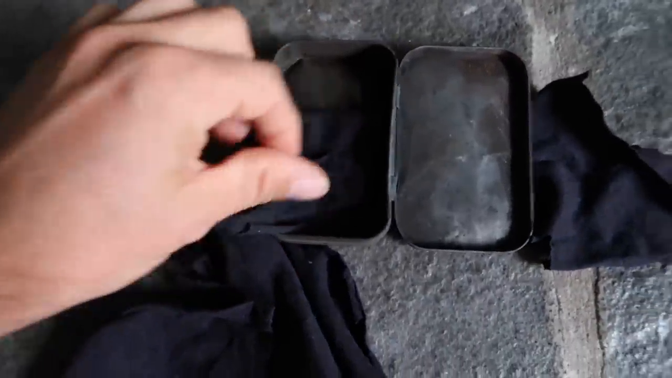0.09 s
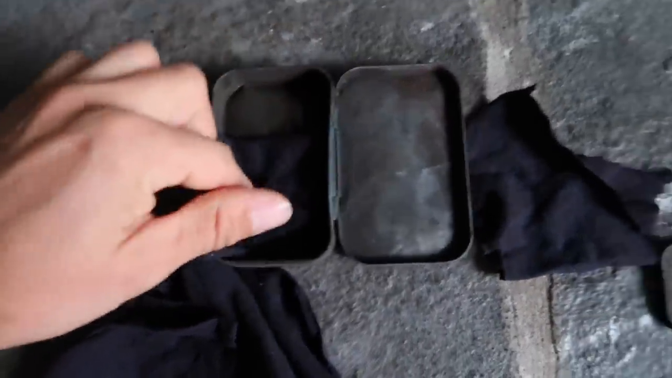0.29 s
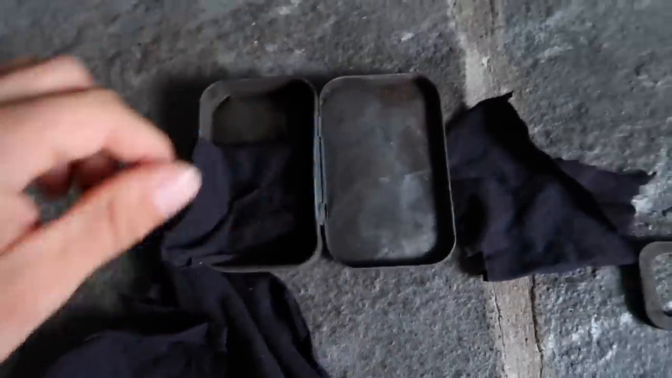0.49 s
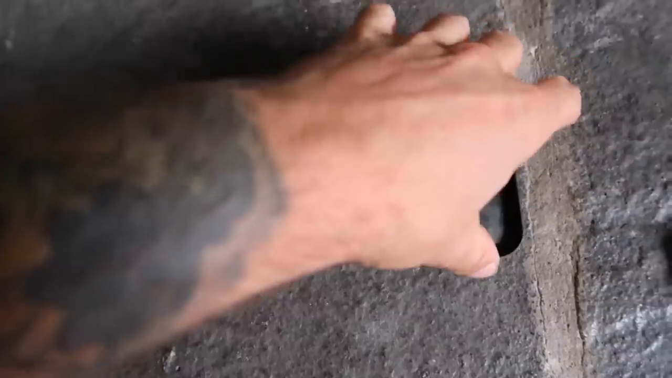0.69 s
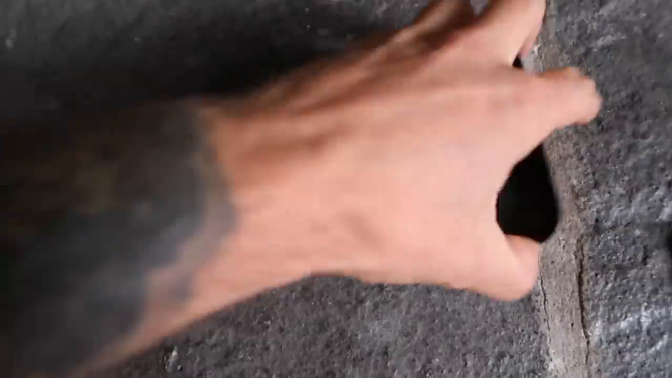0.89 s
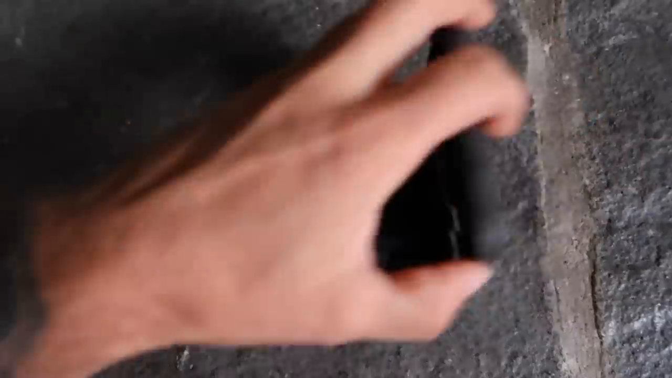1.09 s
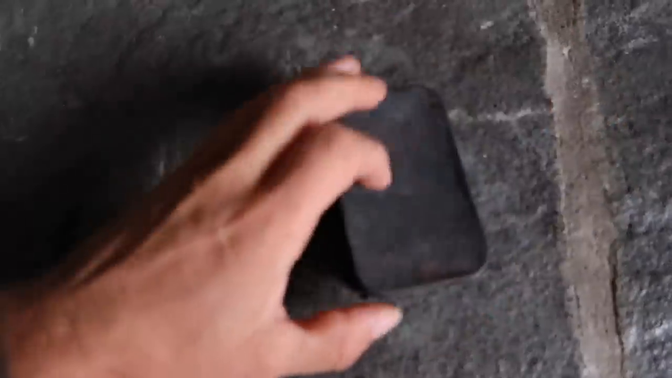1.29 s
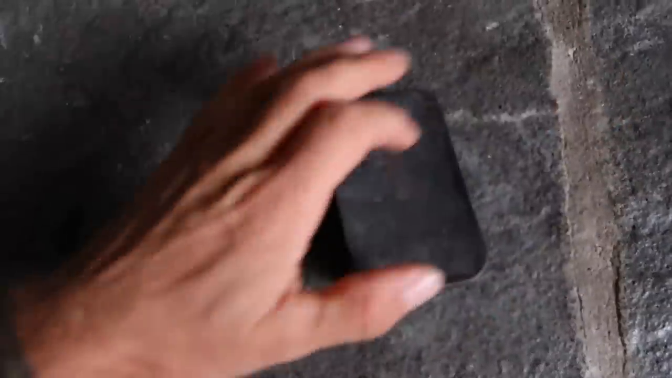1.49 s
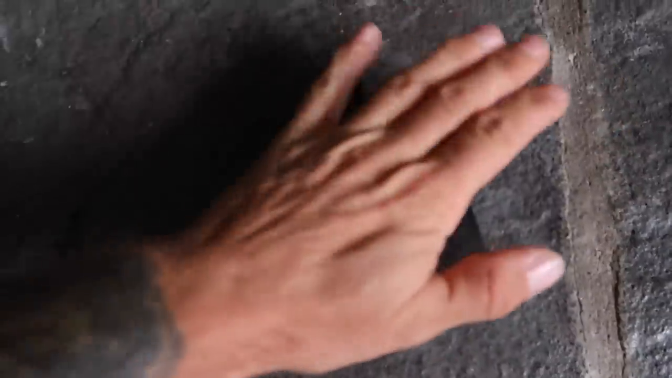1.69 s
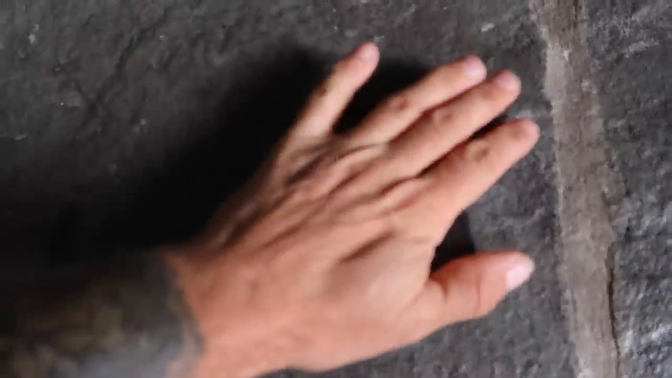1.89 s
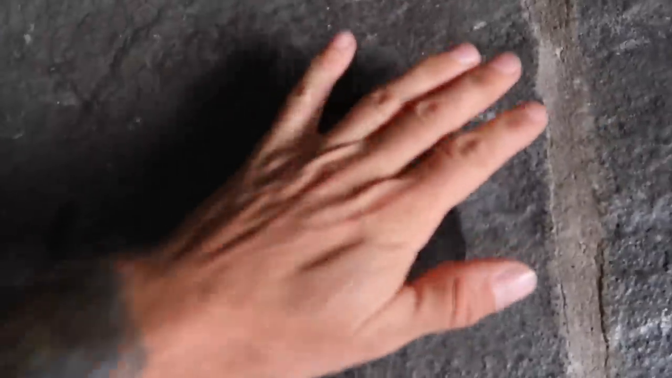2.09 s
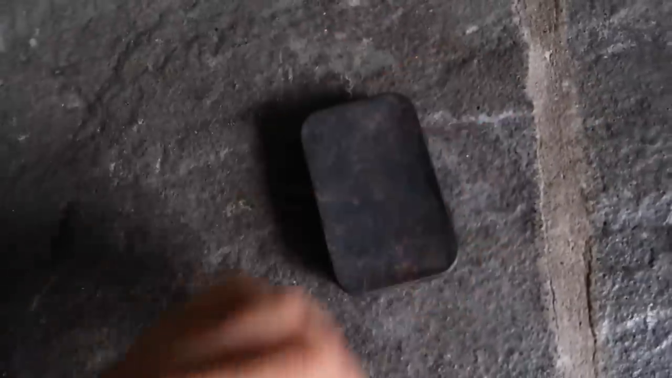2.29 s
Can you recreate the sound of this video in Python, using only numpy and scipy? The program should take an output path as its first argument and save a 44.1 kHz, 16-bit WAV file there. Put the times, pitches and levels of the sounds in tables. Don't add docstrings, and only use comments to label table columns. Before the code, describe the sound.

A small hinged metal tin is handled close up on stone. Near silence, then a sharp rattling clatter at 0.2-0.3 s. Gripping and lifting knocks with scrapes run from 0.8 to 1.1, loud folding clacks from 1.2 to 1.5. After a pause, it snaps shut at 1.83, settles with a low thud at 1.95, and knocks once at 2.14. Small dry room, faint hum, hiss and thin high whine.

```python
import sys
import numpy as np
from scipy import signal
from scipy.fft import rfft, irfft
from scipy.io import wavfile
from scipy.ndimage import uniform_filter1d

SR = 44100
rng = np.random.default_rng(int(sys.argv[2]) if len(sys.argv) > 2 else 0)


def bounce(signal):
    frames = np.transpose(np.atleast_2d(signal))
    limited = np.clip(frames, -1, 1)
    pcm = np.round(limited * 32767).astype(np.int16)
    wavfile.write(sys.argv[1], SR, pcm)


def nominal_scale(level):
    x = np.asarray(level, float) / 20
    return 10 ** x


N = 108045

# f/Hz, level/dB per Hz; then f/Hz, left-right likeness
HUM_COLOUR = [(33, -9), (50, 1), (600, -8.5), (2100, -19), (12000, -34), (13500, -67)]
HUM_SAME = [(70, 1), (300, 0.19), (2400, .3), (15000, -0.11)]
# f/Hz, likeness
PORT_SAME = [(700, 1), (2000, 0.95), (5000, 0.79), (10000, -0.23)]
# f/Hz, t60/s
ROOM_T60 = [(300, 0.2), (1500, 0.24), (12000, 0.55)]

# t/s, level/dB (peak), f/Hz (pitch that rings most), brightness/dB, crack/dB
NUDGE_KNOCKS = [
    (.202, -21, 1540, -63, -7),
    (.2155, -12, 1470, -51, -2.5),
    (.25, -9, 1360, -24, -6),
    (.2555, -12.5, 2080, -16.5, -11),
    (.269, -11, 1300, -18, -5),
    (.2815, 1.5, 1950, -13, 5),
    (.286, -5.5, 1820, -9.5, -1.5),
    (.385, -29, 1220, -73, -4),
]
GRIP_KNOCKS = [
    (.723, -34.5, 1830, -19, -27),
    (.729, -27, 1870, -39.5, -20),
    (.828, -8.5, 2960, -27, -12.5),
    (.88, -25, 1300, -46, -26),
    (.897, -5, 2015, -32, -32),
    (.909, -13, 2200, -31, 15.5),
    (.95, -36, 1870, -55, -20),
    (.961, -20.5, 1880, -20, -32),
]
LIFT_KNOCKS = [
    (.989, -11, 3385, -25.5, -35),
    (1.005, -26, 2150, -19, -4),
    (1.026, -27.5, 1270, -34.5, -32),
    (1.046, -27, 1260, -36.5, -7),
    (1.086, -31.5, 1280, -33, -28),
    (1.095, -14, 1930, -46, -7),
    (1.107, -26, 1240, -31.5, -18),
]
SWING_KNOCKS = [
    (1.158, -29, 1810, -32, -3),
    (1.165, -27.5, 1215, -25, -14.5),
]
FOLD_KNOCKS = [
    (1.216, -4.5, 1820, -24, -23.5),
    (1.218, -20.5, 5140, -20.5, -16),
    (1.302, -25.5, 1163, -28, 17),
    (1.349, -5, 2170, -20, -7.5),
    (1.371, -3.5, 1330, -18, 7),
]
SEAT_KNOCKS = [
    (1.426, -10.5, 1520, -24.5, -3),
    (1.467, -21, 955, -53, -10),
    (1.516, -5, 1730, -33.5, -2.5),
]
PRESS_KNOCKS = [
    (1.807, -27, 982, -63.5, 16),
    (1.816, -23, 1158, -45, 1),
    (1.826, -21, 960, -28.5, 4),
    (1.8325, -3, 1003, -43, 20),
    (1.839, -6.5, 1300, -20.5, 0),
    (1.858, -17.5, 776, -38, -9),
    (1.865, -19, 925, -18, -11),
    (1.874, -9.5, 3280, -24.5, 0),
    (1.879, -12, 1780, -19.5, -0.5),
]
SETTLE_KNOCKS = [
    (1.907, -17.5, 650, -37, -8),
    (1.915, -15, 650, -34, -5),
    (1.938, -17.5, 1150, -41.5, -13),
    (1.948, -14.5, 860, -25, -11.5),
    (1.955, -11, 926, -18.5, 0),
    (1.962, -18, 650, -32, 7.5),
]
LEAVE_KNOCKS = [
    (2.119, -29, 850, -34, 4),
    (2.126, -25.5, 873, -29, 9.5),
    (2.143, -9.5, 1406, -29, -2),
]

# t/s, level/dB
EARLIER_CLANK_TAIL = [(0, -43), (0.031, -66.5), (.08, -76)]
NUDGE_RUB = [(.2, -25), (0.21, -32), (0.227, -15.5), (.245, -19.5), (.258, -23.5), (0.264, -29.5),
             (.273, -18), (.3, -35.5), (0.359, -56)]
GRIP_RUB = [(.715, -50), (.74, -38), (.78, -59), (.87, -46.5), (.885, -38), (.92, -25.5), (.94, -29),
            (.962, -21.5), (.982, -28)]
LIFT_RUB = [(.98, -49), (0.999, -23), (1.05, -31), (1.071, -30), (1.098, -26.5), (1.127, -62)]
SWING_RUB = [(1.115, -50), (1.13, -37.5), (1.148, -36), (1.17, -45), (1.189, -38.5), (1.208, -69.5)]
FOLD_RUB = [(1.22, -26), (1.26, -42.5), (1.333, -36), (1.362, -13.5), (1.4, -27.5), (1.42, -72)]
SEAT_RUB = [(1.379, -25), (1.41, -35), (1.47, -41), (1.499, -43.5), (1.539, -29.5), (1.6, -61)]
PRESS_RUB = [(1.799, -71.5), (1.812, -39), (1.829, -16), (1.848, -24), (1.87, -23.5), (1.895, -45),
             (1.903, -40)]
SETTLE_RUB = [(1.9, -34), (1.916, -30), (1.936, -35), (1.953, -12.5), (1.969, -50), (1.984, -36)]
LEAVE_RUB = [(2.104, -47.5), (2.127, -37), (2.152, -33.5), (2.2, -48), (2.249, -59.5)]

# f/Hz, level/dB
NUDGE_MODES = [(1000, -25), (1357, -2.5), (1545, -3.5), (1776, -5), (1940, -5), (2040, -4), (2410, -22),
               (2822, -9), (3020, -5), (3400, -15.5), (3680, -10.5), (4930, -19.5), (5200, -11)]
GRIP_MODES = [(1300, -3.5), (1540, -15), (1870, 3.5), (2110, 1.5), (2420, -19), (2860, -7.5), (3000, 2.5),
              (3700, 0.5)]
LIFT_MODES = [(650, -2.5), (1255, 3), (1500, -8.5), (1800, 2.5), (1900, -1), (2126, -11), (2450, -2),
              (2815, -9), (3385, -4), (4250, -27.5)]
SWING_MODES = [(800, -13), (1220, -1), (1810, 7.5), (2180, -14), (2730, -8), (3040, -20), (3400, 2.5),
               (4270, -18)]
FOLD_MODES = [(1210, 4.5), (1350, 2.5), (1740, 3.5), (2110, 0), (2345, -4.5), (3020, 0), (3630, -8),
              (5240, -9)]
SEAT_MODES = [(880, 1), (970, 7.5), (1145, 6.5), (1374, -1), (1560, -15), (1747, 8), (2230, 8), (3170, 5.5)]
PRESS_MODES = [(645, -9.5), (770, -22), (910, 2.5), (1150, 4), (1210, -28), (1800, -3.5), (2700, -2.5),
               (3450, -5.5), (3770, -4)]
SETTLE_MODES = [(645, 4), (740, -3.5), (910, 5), (1085, 3), (1210, -21), (1320, -25), (2100, -27),
                (2750, -0.5), (3700, -11)]
LEAVE_MODES = [(870, -6.5), (1220, 4), (1425, -8), (1740, 3.5), (2350, 0)]

# f/Hz, level/dB per Hz
SHEET_OPEN = [(290, -67), (500, -40), (1190, -5.5), (1800, 0), (3470, -11.5), (3990, -15.5), (9000, -36),
              (15000, -42)]
SHEET_SHUT = [(260, -51), (450, -28), (626, 1), (1180, -5), (1700, -11), (3730, -16), (10000, -39.5),
              (15000, -44.5)]
# f/Hz, t60/s
SHEET_T60 = [(600, 0.17), (2000, 0.073), (12000, 0.098)]

# t/s, level/dB (peak), f/Hz
THUDS = [
    (0.281, -33.5, 293),
    (0.827, -32.5, 336),
    (.897, -36.5, 265),
    (1.372, -27.5, 348),
    (1.835, -33.5, 300),
    (1.873, -23.5, 322),
    (1.909, -30.5, 295),
    (1.952, -16.5, 232),
    (2.141, -31, 270),
]
# level/dB, f/Hz, t60/s
TICK = (-44, 6000, .014)

# knocks, rub, (modes, t60/s, sheet, lowest f/Hz, damping share), rub f/Hz, rub brightness/dB
GRIPS = [
    ([], EARLIER_CLANK_TAIL, (NUDGE_MODES, .08, SHEET_OPEN, 900, .9), 1650, 3),
    (NUDGE_KNOCKS, NUDGE_RUB, (NUDGE_MODES, .08, SHEET_OPEN, 620, .9), 2822, 8),
    (GRIP_KNOCKS, GRIP_RUB, (GRIP_MODES, .07, SHEET_OPEN, 900, .8), 2110, -3),
    (LIFT_KNOCKS, LIFT_RUB, (LIFT_MODES, .12, SHEET_OPEN, 950, .8), 3385, -2),
    (SWING_KNOCKS, SWING_RUB, (SWING_MODES, .12, SHEET_OPEN, 900, .9), 1220, -4),
    (FOLD_KNOCKS, FOLD_RUB, (FOLD_MODES, .07, SHEET_OPEN, 850, .8), 2345, 3),
    (SEAT_KNOCKS, SEAT_RUB, (SEAT_MODES, .1, SHEET_OPEN, 620, .95), 900, 3),
    (PRESS_KNOCKS, PRESS_RUB, (PRESS_MODES, .05, SHEET_SHUT, 640, .6), 900, 3),
    (SETTLE_KNOCKS, SETTLE_RUB, (SETTLE_MODES, .045, SHEET_SHUT, 600, .6), 650, -3),
    (LEAVE_KNOCKS, LEAVE_RUB, (LEAVE_MODES, .08, SHEET_OPEN, 620, .95), 1300, -2)]

HUM_DB, WHINE_HZ, WHINE_DB = -52.5, 13230, -71.5
FOCUS_DB, FOCUS_OCT, SCATTER_DB = 8.5, .12, 2.5
RATTLE_DB, RATTLE_S, CRACK_CYCLES, CONTACT_S = 3.5, 0.0014, 2.73, 0.00035
GRIT_PER_S, GRIT_DB, LUMP_DB, LUMP_S, RUB_DENSE_DB = 5000, 3, 6, 0.0034, -3.5
CHATTER_PER_S, CHATTER_DB, CHATTER_S, USUAL_BRIGHT_DB = 400, -10.5, 0.0063, -31
THUD_T60, TICK_S = 0.031, 1.74
ROOM_DB, PAN_DB, EDGE_HZ = -14, -.5, 15600


def read(points, hz):
    f, value = np.transpose(points)
    return np.interp(np.log(hz + 1), np.log(f + 1), value)


def add(mix, s, sound):
    part = mix[..., round(s * SR):][..., :sound.shape[-1]]
    part += sound[..., :part.shape[-1]]


def unit(x):
    return x / np.sqrt(np.sum(x ** 2) / len(np.atleast_2d(x)) + 1e-20)


def wobble(shape, seconds):
    r = np.exp(-1 / (seconds * SR))
    x = signal.lfilter([1], [1, -2 * r, r * r], rng.standard_normal(shape))
    return x / x.std()


def dying(x, colour, t60s):
    hz, t, z = signal.stft(x, SR, nperseg=128)
    t60 = np.maximum(read(t60s, hz), .01)[:, None]
    gain = nominal_scale(read(colour, hz)[:, None] - 60 * t / t60)
    return signal.istft(z * gain, SR, nperseg=128)[1][..., :x.shape[-1]]


def ports(a, b):
    same = np.clip(read(PORT_SAME, np.fft.rfftfreq(len(a), 1 / SR)), -1, 1)
    mid = np.sqrt((1 + same) / 2) * rfft(a)
    side = np.sqrt((1 - same) / 2) * rfft(b)
    return irfft([mid + side, mid - side], len(a))


def hum():
    frames, hz = N // 256 + 5, np.fft.rfftfreq(1024, 1 / SR)
    a, b, c, d, lumps = rng.standard_normal((frames, 513, 5)).T
    lumps = uniform_filter1d(lumps, size=10, axis=0)
    lumps = uniform_filter1d(lumps, size=12, axis=1)
    same = np.clip(read(HUM_SAME, hz), -1, 1)[:, None]
    left = a + 1j * b
    right = same * left + np.sqrt(1 - same ** 2) * (c + 1j * d)
    gain = nominal_scale(read(HUM_COLOUR, hz)[:, None] + lumps / lumps.std())
    noise = signal.istft(np.array([left, right]) * gain, nperseg=1024, noverlap=768)[1][:, :N]
    phase = [[0], [2.5]]
    whine = nominal_scale(WHINE_DB) * np.sin(2 * np.pi * WHINE_HZ * np.arange(N) / SR + phase)
    return nominal_scale(HUM_DB) * np.sqrt(N) * unit(noise) + whine


def ring(modes, t60, sheet, low_hz, damp, focus_hz, bright_db, crack_db=-60, dense_db=0):
    t = np.arange(6000) / SR
    hz, db = np.transpose(modes)[:, :, None]
    focus = FOCUS_DB * np.exp(-(np.log2(hz / focus_hz) / FOCUS_OCT) ** 2)
    db = db + SCATTER_DB * rng.standard_normal(hz.shape) + focus
    rattle = RATTLE_DB * wobble((len(hz), len(t)), RATTLE_S)
    waves = nominal_scale(db - 60 * t / t60 + rattle) * np.sin(2 * np.pi * hz * t)
    clear = ports(waves.sum(0), (waves * rng.standard_normal(hz.shape)).sum(0))

    tilted = [(f, d + bright_db * np.clip(np.log2(f / 2500), 0, 1)) for f, d in sheet]
    noise = rng.standard_normal((2, len(t)))
    dense = ports(*dying(noise, tilted, np.multiply(SHEET_T60, [1, damp])))

    crack = np.sin(2 * np.pi * focus_hz * t) * np.exp(-(t * focus_hz / CRACK_CYCLES) ** 2 * 4)
    out = unit(clear) + nominal_scale(dense_db) * unit(dense) + nominal_scale(crack_db) * unit(crack)
    fade = np.clip((t[-1] - t) / 0.046, 0, 1) ** 2
    out = out * np.minimum(t / CONTACT_S, 1) * fade
    low_cut = signal.butter(4, low_hz, "high", fs=SR, output="sos")
    return unit(signal.sosfilt(low_cut, out))


def rub(curve, *tin):
    n = SR // 2
    start = curve[0][0]
    sizes = nominal_scale(GRIT_DB * np.minimum(rng.exponential(1, n), 4))
    grit = sizes * (rng.random(n) < GRIT_PER_S / SR) * rng.choice([-1., 1.], n)
    grit = unit(grit * nominal_scale(LUMP_DB * wobble(n, LUMP_S))) * np.sqrt(n)
    level = nominal_scale(np.interp(start + np.arange(n) / SR, *np.transpose(curve), right=-200))
    out = np.zeros((2, N))
    answer = ring(*tin, dense_db=RUB_DENSE_DB)
    add(out, start, signal.fftconvolve((grit * level)[None], answer, axes=1))
    return out


def room(x):
    tail = dying(rng.standard_normal((2, SR // 2)), [(100, -10.5), (12000, -5)], ROOM_T60)
    tail[:, :250] = 0
    return signal.fftconvolve(x[None], unit(tail), axes=1)[:, :N]


def knocks(rows, *tin):
    out, t = np.zeros((2, N)), np.arange(1500) / SR
    for s, db, hz, bright_db, crack_db in rows:
        blows = rng.standard_normal(len(t)) * (rng.random(len(t)) < CHATTER_PER_S / SR)
        blows *= nominal_scale(CHATTER_DB - 20 * (t / CHATTER_S) ** 2)
        blows[0] = 1
        answer = ring(*tin, hz, bright_db - USUAL_BRIGHT_DB, crack_db)
        sound = signal.fftconvolve(blows[None], answer, axes=1)
        add(out, s, nominal_scale(db) * sound / abs(sound.mean(0)).max())
    return out


def thuds():
    out, t = np.zeros(N), np.arange(6000) / SR
    for s, db, hz in THUDS:
        push = np.sin(2 * np.pi * hz * t) * np.minimum(t / .003, 1)
        add(out, s, nominal_scale(db - 60 * t / THUD_T60) * push)
    return out


def tick():
    out, t = np.zeros(N), np.arange(6000) / SR
    db, hz, t60 = TICK
    poles = [1, -1.4 * np.cos(2 * np.pi * hz / SR), .49]
    burst = signal.lfilter([1, 0, -1], poles, rng.standard_normal(len(t))) / 4
    add(out, TICK_S, nominal_scale(db - 60 * t / t60) * burst)
    return out


def scene():
    tin = np.zeros((2, N)) + thuds() + tick()
    for rows, curve, grip, rub_hz, rub_bright_db in GRIPS:
        tin += knocks(rows, *grip)
        tin += rub(curve, *grip, rub_hz, rub_bright_db)
    pan = nominal_scale(np.array([[PAN_DB], [-PAN_DB]]))
    return tin * pan + nominal_scale(ROOM_DB) * room(tin.mean(0)) + hum()


def roll_off(x):
    return signal.sosfilt(signal.butter(12, 15770, fs=SR, output="sos"), x)


def record(dry):
    limited = np.tanh(dry / 2) * 2
    edge = signal.firwin(255, EDGE_HZ, window=("kaiser", 9), fs=SR)[None]
    mix = signal.oaconvolve(limited, edge, "same")
    return roll_off(mix)


dry = scene()
out = record(dry)
bounce(out)
```